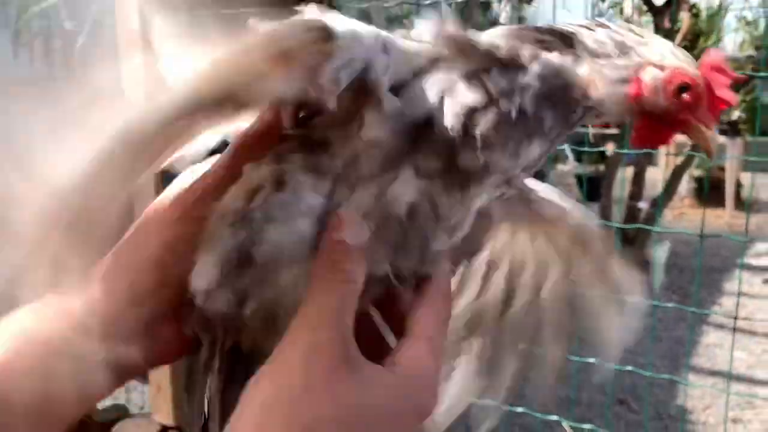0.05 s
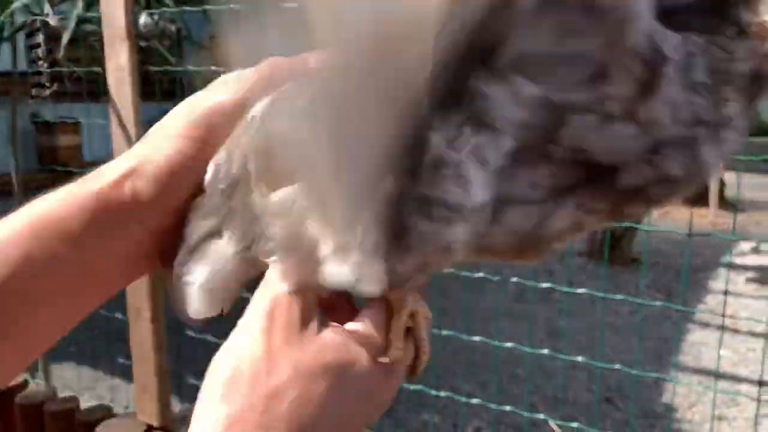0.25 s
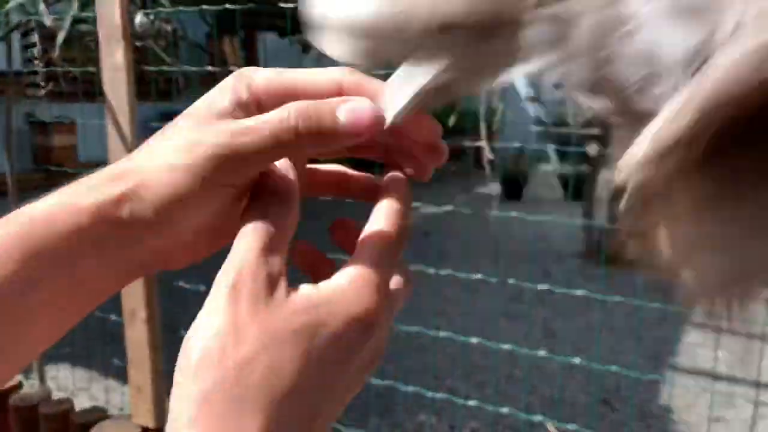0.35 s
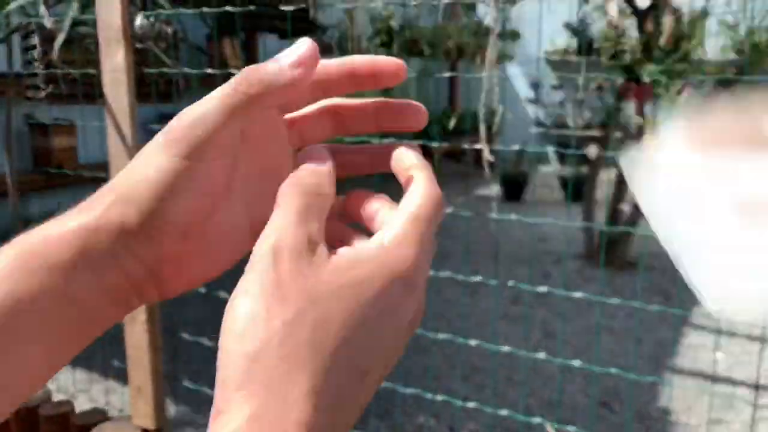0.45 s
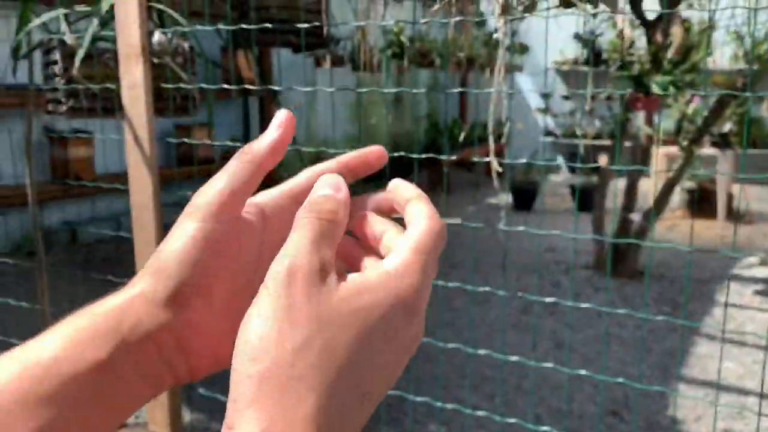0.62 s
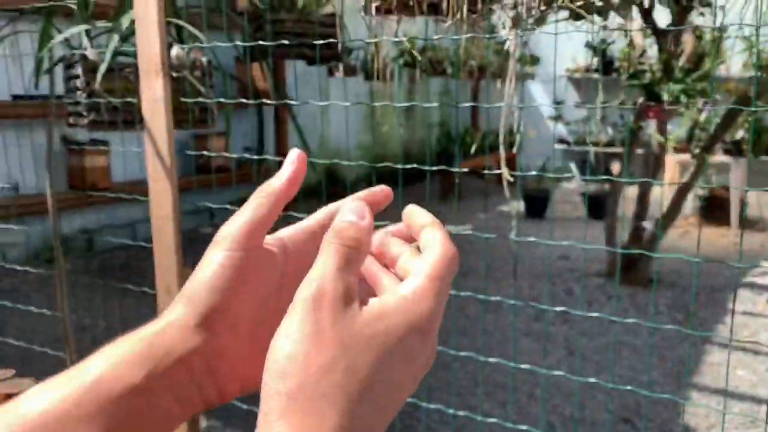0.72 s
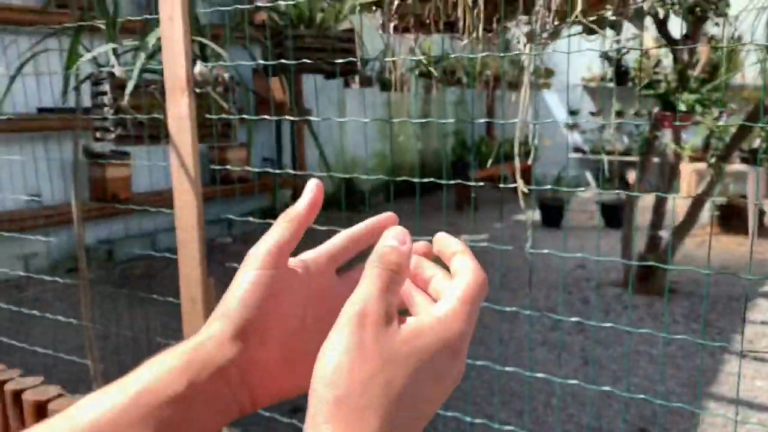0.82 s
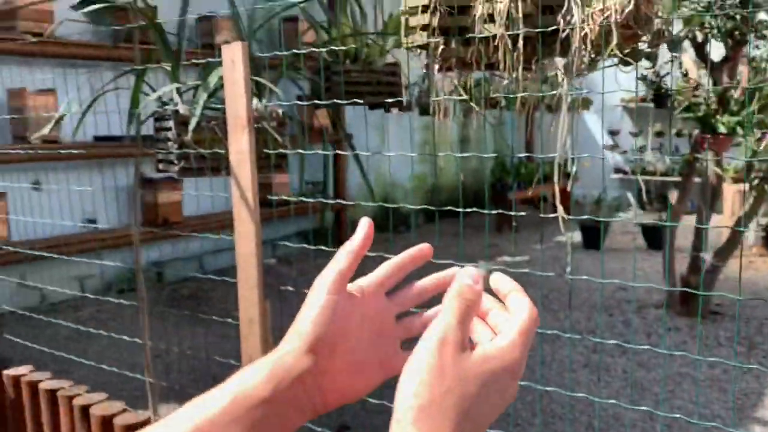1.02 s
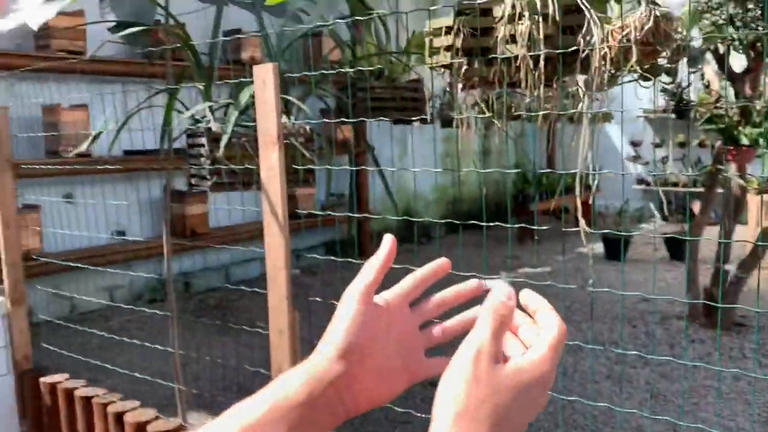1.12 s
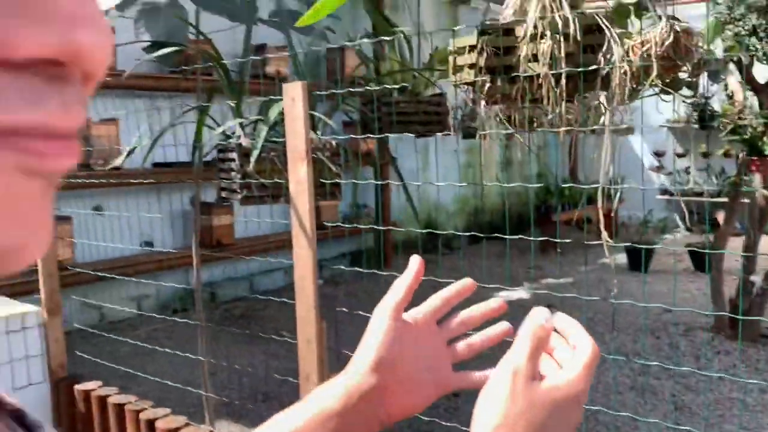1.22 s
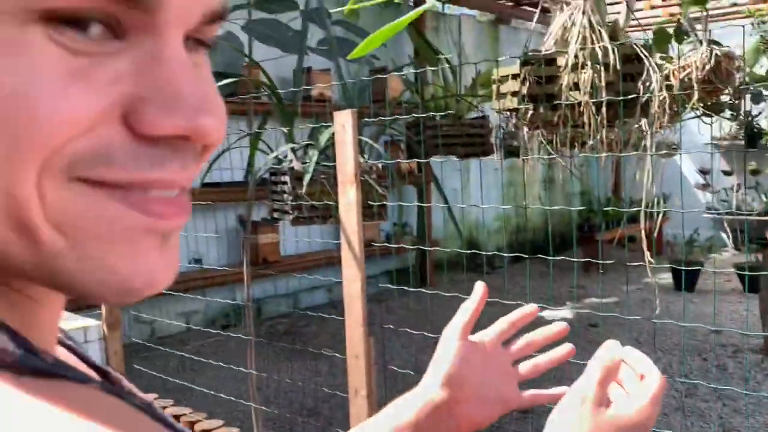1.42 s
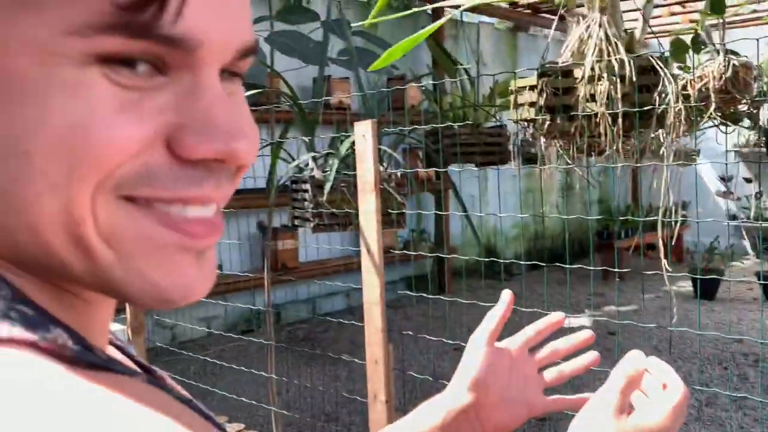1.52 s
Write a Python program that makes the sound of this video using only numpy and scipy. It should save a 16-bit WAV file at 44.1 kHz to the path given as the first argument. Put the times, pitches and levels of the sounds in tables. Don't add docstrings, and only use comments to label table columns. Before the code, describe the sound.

Rapid feathery wing flapping bursts up close with short clucks and air buffets, then recedes into quiet

```python
import sys
import numpy as np
from scipy import signal
from scipy.fft import rfft, irfft, next_fast_len
from scipy.io import wavfile
from scipy.ndimage import uniform_filter1d, map_coordinates

SR = 44100
rng = np.random.default_rng(int(sys.argv[2]) if len(sys.argv) > 2 else 0)


def level_to_linear(level):
    exponent = np.asarray(level, float) / 20
    return 10 ** exponent


def inscribe(sig):
    pcm = np.round(np.clip(np.atleast_2d(sig).T, -1, 1) * 32767)
    wavfile.write(sys.argv[1], SR, pcm.astype(np.int16))


N = 68355


def unit_rms(x):
    return x / np.sqrt(np.mean(x ** 2))


def table(points, hz):
    p = np.array(points, float)
    return np.interp(np.log(hz + 1), np.log(p[:, 0]), p[:, 1])


def colour(x, gain):
    size = next_fast_len(N + 16384)
    hz = np.fft.rfftfreq(size, 1 / SR)
    return irfft(rfft(x, size) * gain(hz), size)[..., :N]


def resonance(hz, centre_hz, width_hz):
    return 1 / (1 + 1j * (hz - centre_hz ** 2 / (hz + 1e-9)) / width_hz)


def walk(rate_hz):
    k = int(SR / rate_hz)
    steps = np.repeat(rng.standard_normal(N // k + 1), k)
    smooth = uniform_filter1d(uniform_filter1d(steps, k), k)
    return unit_rms(smooth[:N])


# hz, side_minus_mid_db
PORT_DIFFERENCE = [(60, -9.5), (300, -4), (1500, -3.5), (3000, -4), (16000, 0)]


def pair(spectrum, grain=1., wide_db=0.):
    mid, side = rng.standard_normal((2, N)) * grain
    mid = colour(mid, lambda f: level_to_linear(table(spectrum, f)))
    side = colour(side, lambda f: level_to_linear(table(spectrum, f) + table(PORT_DIFFERENCE, f) + wide_db))
    return np.array([mid + side, mid - side]) / mid.std()


# hz, density_db [dB per Hz]
YARD_SPECTRUM = [(90, -38.5), (150, -16), (750, -23.5), (900, -32), (1400, -31), (2300, -43.5),
                 (9000, -52.5), (15000, -67.5)]


def yard():
    return level_to_linear(-61 + 0.59 * walk(2.2)) * pair(YARD_SPECTRUM, wide_db=6.0)


# time_s, level_db
AIR_LEVEL = [(0, -38.5), (0.042, -26), (0.072, -46), (0.097, -23.5), (.17, -43), (.21, -32.5), (.29, -25.5),
             (.40, -33.5), (.475, -21.5), (.51, -36), (.6, -38), (0.699, -30), (.75, -38.5), (.85, -45),
             (.99, -39.5), (1.091, -45), (1.3, -53), (1.55, -53.5)]
# hz, density_db [dB per Hz]
AIR_RUMBLE = [(12, -44.5), (20, -1.5), (52, 2), (70, 6), (119, -5.5), (200, -17), (260, -18), (440, -120)]


def air(t):
    time_s, level_db = np.array(AIR_LEVEL).T
    db = np.interp(t, time_s, level_db)
    return level_to_linear(db + 1.2 * walk(25)) * pair(AIR_RUMBLE, wide_db=-3.5)


def patchy(x, t):
    out = 0
    for hz in 500 * 2. ** np.arange(0, 5.1, .5):
        octaves_off = lambda f: np.abs(np.log2(np.clip(f, 500, 16000) / hz))
        band = colour(x, lambda f: np.clip(1 - 2 * octaves_off(f), 0, 1))
        dull_db = -6.5 * (t - 0.7665) * (hz > 10000)
        out = out + band * level_to_linear(2.2 * walk(30.01) + dull_db)
    return out


# centre_s, hiss_level_db, length_s, flutter_level_db
WING_STROKES = [(0.061, -46.5, 0.16, -42), (0.094, -43, 0.069, -42), (0.224, -38.5, 0.14, -36.5),
                (0.3, -41.5, 0.092, -36), (0.349, -44, 0.13, -33), (0.442, -36, 0.047, -34),
                (0.516, -46.5, 0.065, -44.5), (0.618, -44.5, 0.1, -46), (0.723, -46, 0.087, -40.5),
                (0.831, -47.5, 0.12, -45.5), (0.942, -48.5, 0.099, -46.5), (1.063, -51, 0.13, -48.5),
                (1.167, -53, 0.083, -52), (1.228, -59, 0.17, -57), (1.371, -69, 0.23, -72)]
# hz, density_db [dB per Hz]
BARB_HISS = [(300, -33.5), (500, -1.5), (1600, -11), (2500, -12), (6000, -13.5), (10000, -17.5),
             (14000, -23.5), (16000, -17.5)]
# hz, density_db [dB per Hz]
VANE_FLUTTER = [(71, -36), (120, 0), (296, 1), (421, -8), (780, -26.5), (900, -26), (1170, -25),
                (1980, -120)]


def wings(t):
    hiss_power, flutter_power = np.zeros(N), np.zeros(N)
    for centre_s, hiss_db, length_s, flutter_db in WING_STROKES:
        swell = np.cos(np.pi * np.clip((t - centre_s) / (1.45 * length_s), -.5, .5)) ** 2
        hiss_power += swell * level_to_linear(2 * hiss_db)
        flutter_power += swell * level_to_linear(2 * flutter_db)
    barbs = level_to_linear(2 * walk(2500))
    hiss = patchy(pair(BARB_HISS, barbs, wide_db=2.5), t)
    flutter = pair(VANE_FLUTTER, wide_db=-3.5)
    return (np.sqrt(hiss_power) * level_to_linear(1.5 * walk(50.2)) * hiss
            + np.sqrt(flutter_power) * level_to_linear(3.75 * walk(44.75)) * flutter)


def bursts(t, rows, spectrum, ragged_db):
    rise_s, tone_db, tone_width = 0.00034, 6.5, 0.12
    out, noise = 0, level_to_linear(ragged_db * walk(1500)) * pair(spectrum, wide_db=-1.5)
    for start_s, peak_db, ring_s, tone_hz in rows:
        age = np.maximum(t - start_s, 0)
        shape = level_to_linear(peak_db) * (1 - np.exp(-age / rise_s)) * np.exp(-age / ring_s)
        tone = lambda f: 1 + level_to_linear(tone_db) * resonance(f, tone_hz, tone_width * tone_hz)
        out = out + colour(shape * noise, tone)
    return out


# start_s, peak_db, ring_s, tone_hz
WING_KNOCKS = [(.055, -37, .003, 800), (0.079, -32, 0.0042, 1000), (.099, -34, .004, 900),
               (.108, -33, 0.004, 1300), (.158, -38, .005, 900), (.171, -36, .003, 1300),
               (0.28, -37, 0.0049, 500), (0.31, -35, 0.0096, 400), (0.3213, -18.5, .003, 1050),
               (0.3278, -15, 0.0023, 1400), (0.3281, -18, 0.0037, 700), (0.428, -41.5, 0.0028, 900),
               (0.4376, -26.5, 0.0031, 1050), (0.7194, -46, 0.0075, 1000), (0.948, -45, 0.009, 500)]
# hz, density_db [dB per Hz]
KNOCK_SPECTRUM = [(150, -23.5), (400, -5.5), (900, -9.5), (1900, -19.5), (3000, -44)]


def knocks(t):
    return bursts(t, WING_KNOCKS, KNOCK_SPECTRUM, ragged_db=-1.5)


# start_s, peak_db, first_pitch_hz, slowing_s, right_port_lag_s
AIR_EDDIES = [(.091, -22, 260, .03, .0003), (.103, -22, 300, .02, .0003),
              (0.235, -4.5, 105.4, 0.021, .0015), (0.307, -33, 329, 0.0092, -0.035),
              (0.3157, -0.5, 618.4, 0.002216, .0003), (0.3303, -18, 333, 0.028, .0003),
              (0.372, -17.5, 124.4, 0.03, .0004), (0.4393, -12.5, 197.6, 0.0093, .0035),
              (0.526, -20.5, 68.3, 0.053, -0.0047), (0.557, -20, 68, 0.073, -0.0044),
              (0.679, -29.5, 132, .02, -0.00072), (0.6969, -31.5, 107, 0.08, 0.0032),
              (0.77, -30.5, 95, 0.021, 0.0019), (0.956, -34, 84.4, 0.034, .0002),
              (1.082, -32.5, 119, 0.028, .0003), (1.436, -41.5, 75.8, 0.068, .0002)]


def eddies(t):
    out = 0
    for start_s, peak_db, pitch_hz, slowing_s, lag_s in AIR_EDDIES:
        age = np.maximum(t - start_s - np.array([[0], [lag_s]]), 0)
        turns = pitch_hz * slowing_s * np.log1p(age / slowing_s)
        last_turn = 2.1 * (pitch_hz / 260) ** .33
        rise = 1 - np.exp(-(turns / 0.48) ** 2)
        shape = rise / (1 + np.exp((turns - last_turn) / .25))
        out = out + level_to_linear(peak_db) * shape * np.sin(2 * np.pi * turns)
    return out * level_to_linear(1.72 * walk(500))


# start_s, length_s, level_db, pitch_hz, roughness [0-1]
HEN_CLUCKS = [
    (0.184, 0.011, -19, 657.6, .38),
    (0.1985, 0.0135, -19, 585, .7),
    (0.21, 0.01, -37, 599, 0.7),
    (0.604, 0.018, -31, 684, 0.68),
    (0.857, 0.014, -49, 397, .4),
    (0.865, 0.025, -32.5, 348.8, 0.65),
    (1.014, 0.016, -25, 468, 0.5),
]
BEAK_TREBLE = [8, 10.5, 11.5, -18, 18.5, -7, -15]
CLUCK_SWELL = [.9, .15, .13, .13, 0.22, .13, 0.11]
# centre_hz, width_hz, level_db
THROAT_RESONANCES = [(620, 170, -5.5), (1404, 720, -1.5), (1824, 81, -4), (2634, 250, -2), (3020, 410, -9),
                     (4144, 470, -19.5)]


def clucks(t):
    sag, jitter, breathiness, limp = 0.008, 0.07, 0.81, .6
    out, shake, breath = 0, walk(400), rng.standard_normal(N)
    for (start_s, length_s, level_db, pitch_hz, rough), treble_db, rise in zip(
            HEN_CLUCKS, BEAK_TREBLE, CLUCK_SWELL):
        u = (t - start_s) / length_s
        pitch = pitch_hz * (1 - sag * np.clip(u, 0, 1)) * (1 + jitter * rough * shake)
        phase = 2 * np.pi * np.cumsum(pitch) / SR
        harmonics = range(1, int(5900 / pitch_hz) + 1)
        buzz = unit_rms(sum(np.cos(k * phase) for k in harmonics))
        buzz = buzz * (1 - rough / 2) * (1 + limp * rough * np.cos(phase / 2))
        buzz = buzz + breathiness * rough * breath * (1 + np.cos(phase))
        swell = np.clip(0.46 + 0.63 * u / rise, 0, 1)
        gate = np.clip(u / 0.2, 0, 1) * swell * np.clip((1.15 - u) / 0.26, 0, 1)
        beak = lambda f: level_to_linear(treble_db * np.clip((f - 1900) / 600, 0, 1))
        throat = lambda f: sum(level_to_linear(db) * resonance(f, centre_hz, width_hz) ** 2
                               for centre_hz, width_hz, db in THROAT_RESONANCES)
        out = out + level_to_linear(level_db) * colour(gate * buzz, lambda f: beak(f) * throat(f)) * 2
    return out


# start_s, peak_db, ring_s, tone_hz
FEATHER_CLAPS = [(0.247, -41, 0.0045, 9800), (0.3146, -36, .002, 8200), (0.3180, -21, 0.0018, 8100),
                 (0.3164, -31, 0.0014, 6060), (0.3203, -25.5, 0.001, 3500), (0.369, -44, 0.0023, 6000),
                 (0.4258, -38, 0.0046, 6500), (0.4273, -38, 0.0017, 5000), (0.4310, -29, 0.0032, 6560),
                 (0.4328, -24, .0012, 6340), (.4340, -27, .0015, 3700), (.4352, -20.5, .0015, 6500),
                 (0.4392, -22.5, 0.0015, 8450), (0.4403, -25, 0.0018, 2070), (0.4412, -35.5, 0.0015, 8500),
                 (0.447, -35.5, 0.0015, 6500), (0.452, -39, 0.0017, 5000), (0.462, -49, 0.0033, 5000),
                 (0.473, -41, 0.004, 5000), (0.633, -51, 0.0018, 3500), (0.717, -48, 0.013, 4500),
                 (1.052, -67, 0.0028, 5000), (1.241, -57.5, 0.0049, 4500), (1.40, -70, 0.0022, 6070),
                 (1.457, -71, 0.0022, 6020), (1.49, -70.5, 0.00095, 6060), (1.515, -75, 0.0019, 5980),
                 (1.531, -57, 0.0015, 6060)]
# hz, density_db [dB per Hz]
CLAP_SPECTRUM = [(600, -34), (2000, -10), (2800, -16), (3550, -8), (4600, -11.5), (6400, -11.5),
                 (8000, -19), (16000, -17)]


def claps(t):
    crack = bursts(t, FEATHER_CLAPS, CLAP_SPECTRUM, ragged_db=1.8)
    bright = colour(crack[1], lambda f: level_to_linear(10) * np.exp(-((f - 9780) / 1980) ** 4))
    return crack + bright * np.array([[0], [1]])


def echo(x):
    echo_db, t60_s = -15, 0.096
    tail = rng.standard_normal((2, 9000)) * level_to_linear(-60 * np.arange(9000) / SR / t60_s)
    tail /= np.sqrt(np.sum(tail ** 2, axis=1, keepdims=True))
    return signal.fftconvolve(x, tail, axes=1)[:, :N] * level_to_linear(echo_db)


# time_s, left_port_lag_s
HEN_BEARING = [(0, -.00013), (.17, -.00013), (.19, .00004), (.35, .00002), (.5, .00025), (1.55, .00025)]


def bearing(x, t):
    time_s, lag_s = np.array(HEN_BEARING).T
    lag = np.interp(t, time_s, lag_s)
    left = map_coordinates(x[0], [(t - lag) * SR], order=5, mode="mirror")
    return np.array([left, x[1]])


# start_s, length_s, pitch_hz, level_db
FAR_COOS = [
    (1.064, 0.16, 627, -57.5),
    (1.285, 0.1, 620, -57),
    (1.388, 0.077, 650, -62.5),
]


def coos(t):
    waver = np.cumsum(1 + 0.014 * walk(30.78)) / SR
    out = 0
    for start_s, length_s, pitch_hz, level_db in FAR_COOS:
        swell = np.sin(np.pi * np.clip((t - start_s) / length_s, 0, 1)) ** .5
        out = out + level_to_linear(level_db) * swell * np.sin(2 * np.pi * pitch_hz * waver)
    return out


def scene():
    t = np.arange(N) / SR
    hen = knocks(t) + clucks(t) + claps(t)
    hen = bearing(hen + wings(t) + echo(hen), t)
    return yard() + air(t) + hen + eddies(t) + coos(t)


def above(f, hz):
    return np.clip((f - hz) / 120 + .5, 0, 1)


def roll_off(x):
    return signal.sosfilt(signal.butter(12, 16620, fs=SR, output="sos"), x)


def record(dry):
    port_hz, port_width_hz, port_db, port_from_s = 8070, 820, 8, 0.26
    dip_hz, dip_width_hz, alike_top_hz, top_hz, bass_hz = 11850, 480, 14450, 15750, 44
    opposed_db, alike_db = -16, -7.5

    def ring(f):
        bell = np.exp(-((f - port_hz) / port_width_hz) ** 2)
        return (level_to_linear(port_db) - 1) * np.clip((f - port_hz) / 200 + .5, 0, 1) * bell

    on_right = np.clip((np.arange(N) / SR - port_from_s) / 0.016, 0, 1)
    right = dry[1] + colour(dry[1] * on_right, ring)
    opposed = lambda f: 1 - above(np.abs(f - dip_hz), dip_width_hz) + above(f, alike_top_hz)
    alike = lambda f: (f > dip_hz) * (1 - opposed(f))
    mid = colour(dry[0] + right, lambda f: level_to_linear(opposed_db * opposed(f) - alike_db / 3 * alike(f)) / 2)
    side = colour(dry[0] - right, lambda f: level_to_linear(2.4 * opposed(f) + alike_db * alike(f)) / 2)
    bass_cut = lambda f: f ** 2 / np.sqrt(f ** 4 + bass_hz ** 4)
    x = colour(np.array([mid + side, mid - side]), lambda f: (1 - above(f, top_hz)) * bass_cut(f))
    return roll_off(np.tanh(x))


dry = scene()
out = record(dry)
inscribe(out)
```